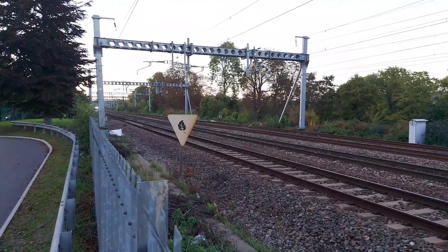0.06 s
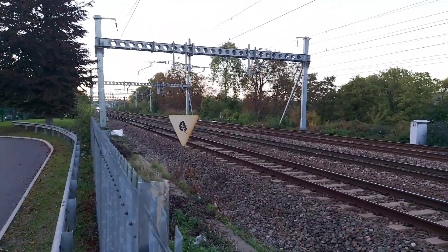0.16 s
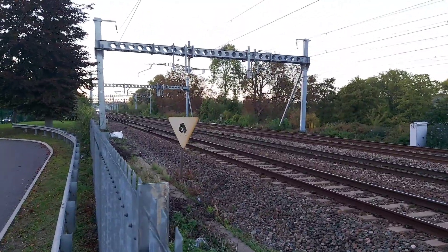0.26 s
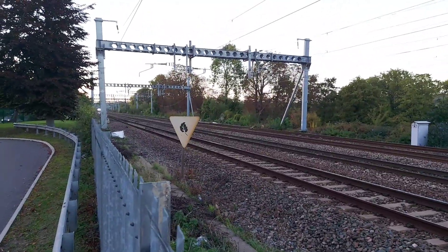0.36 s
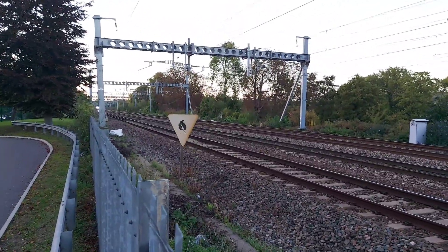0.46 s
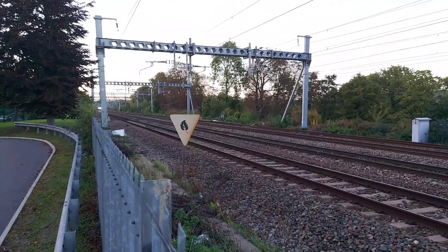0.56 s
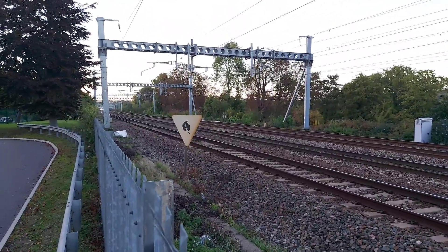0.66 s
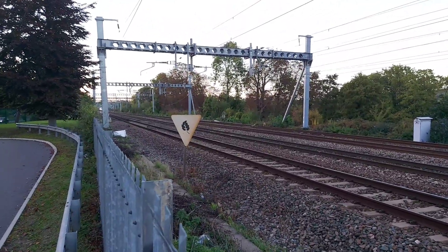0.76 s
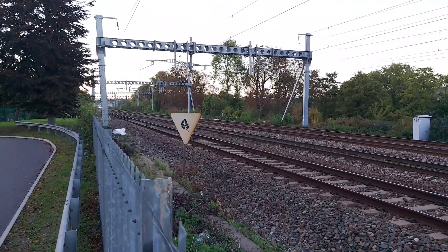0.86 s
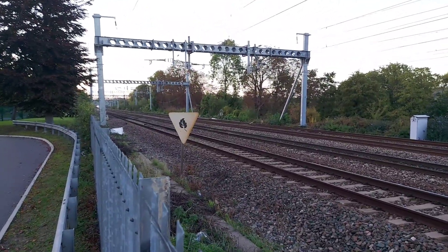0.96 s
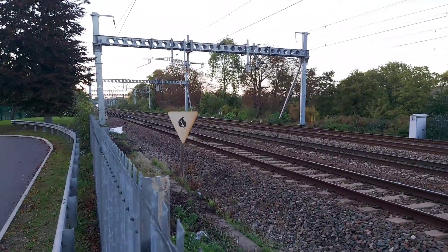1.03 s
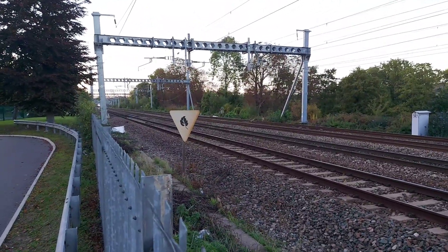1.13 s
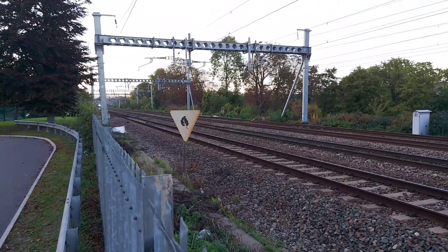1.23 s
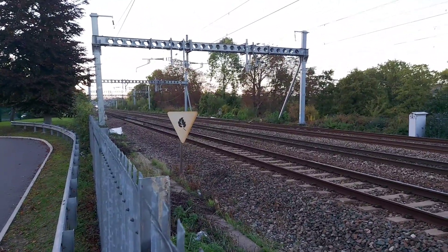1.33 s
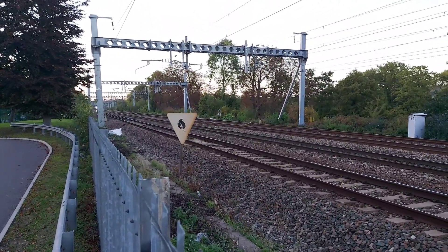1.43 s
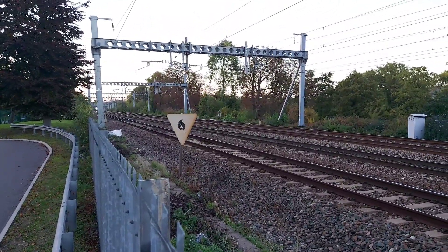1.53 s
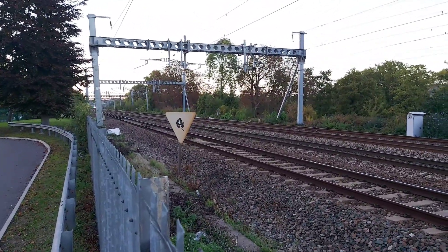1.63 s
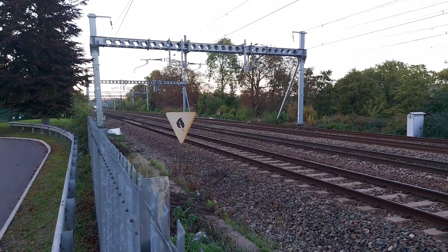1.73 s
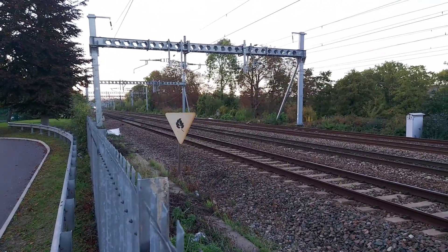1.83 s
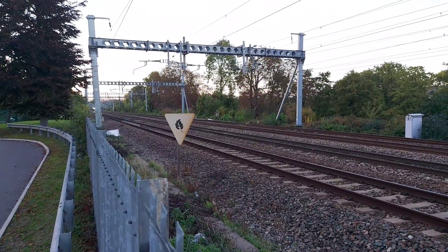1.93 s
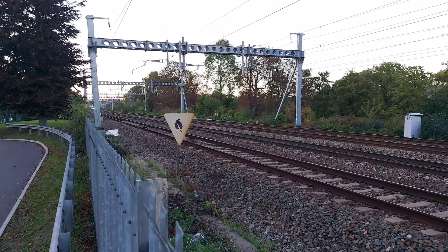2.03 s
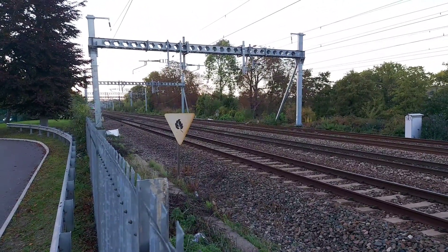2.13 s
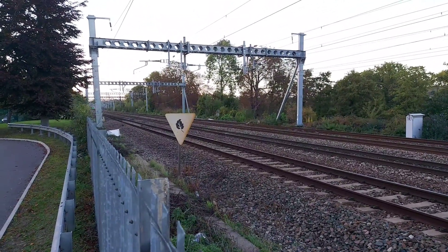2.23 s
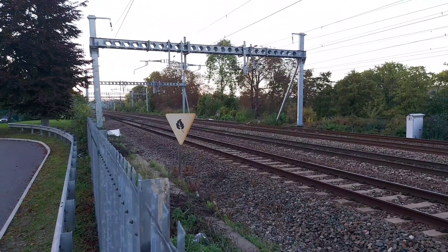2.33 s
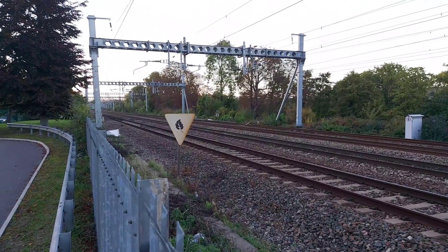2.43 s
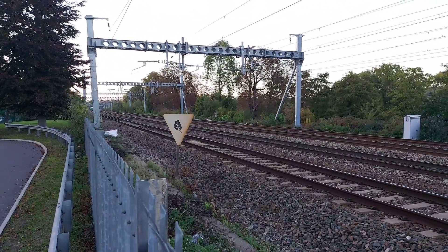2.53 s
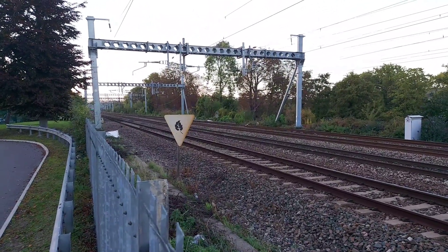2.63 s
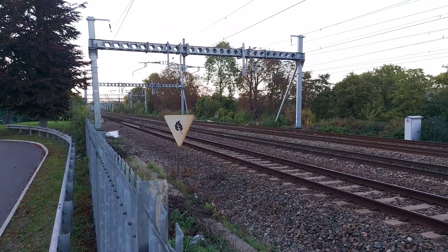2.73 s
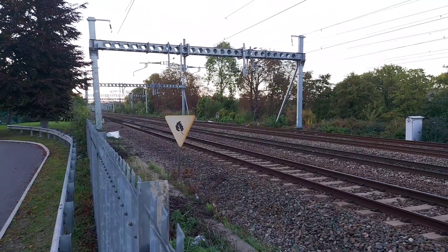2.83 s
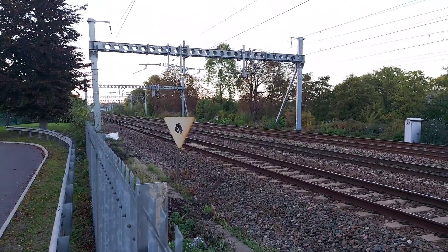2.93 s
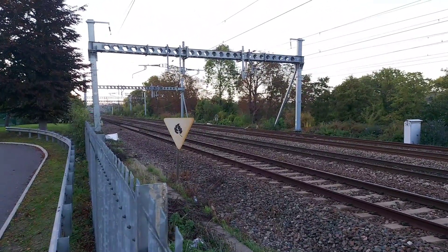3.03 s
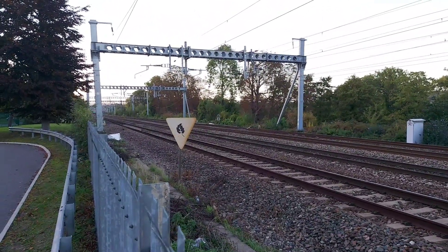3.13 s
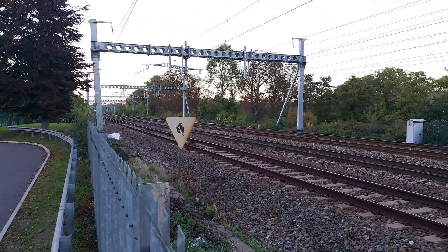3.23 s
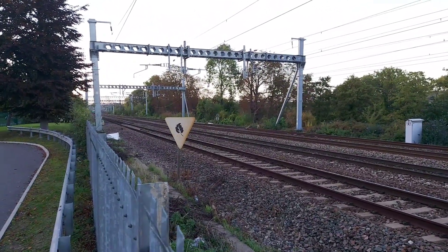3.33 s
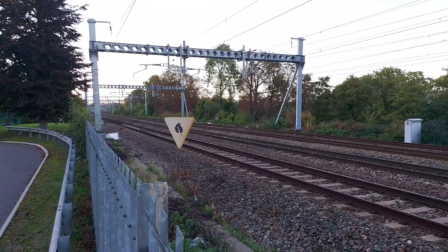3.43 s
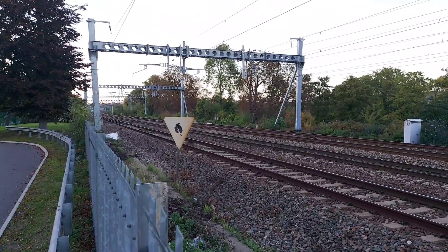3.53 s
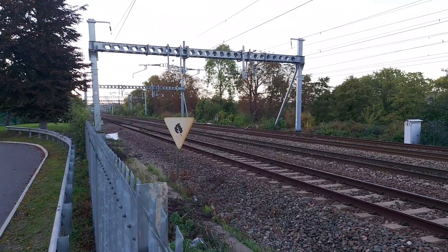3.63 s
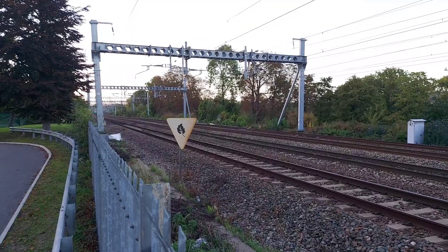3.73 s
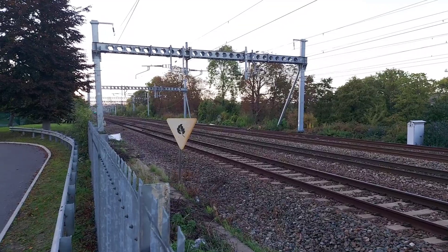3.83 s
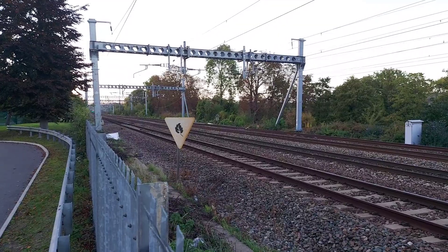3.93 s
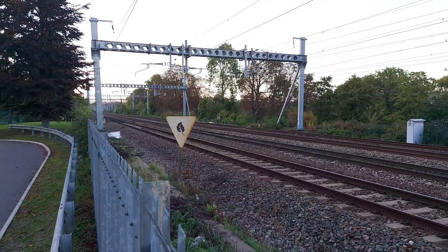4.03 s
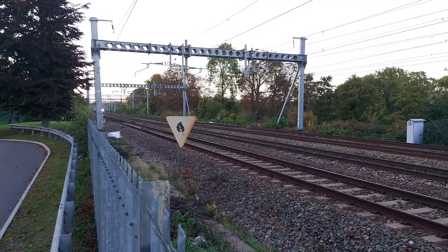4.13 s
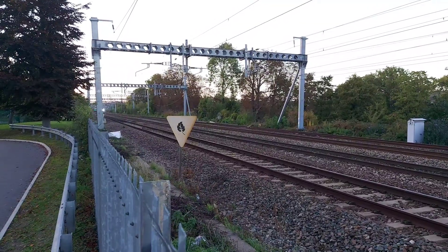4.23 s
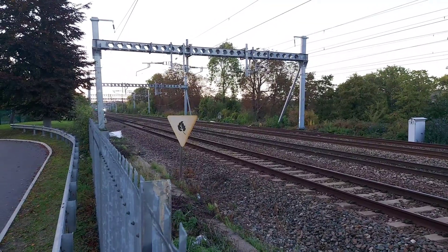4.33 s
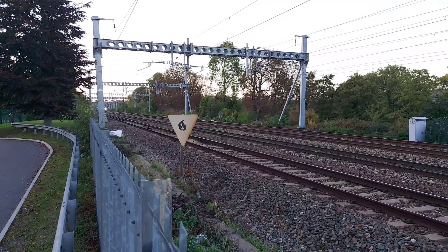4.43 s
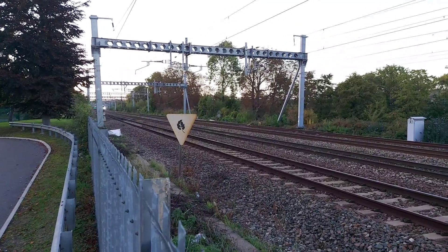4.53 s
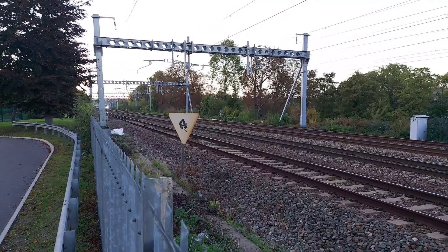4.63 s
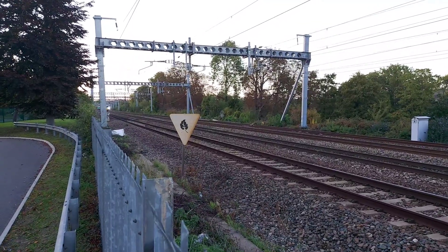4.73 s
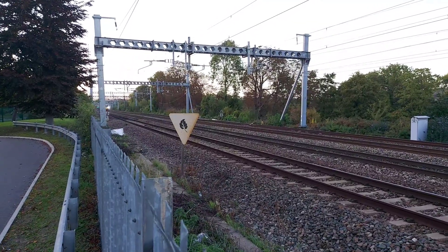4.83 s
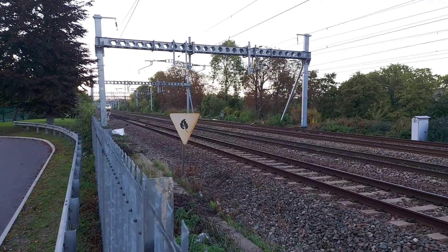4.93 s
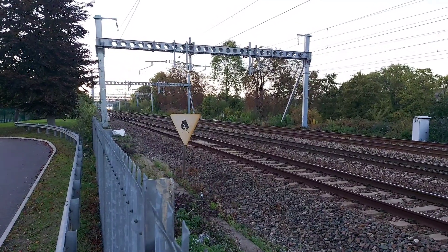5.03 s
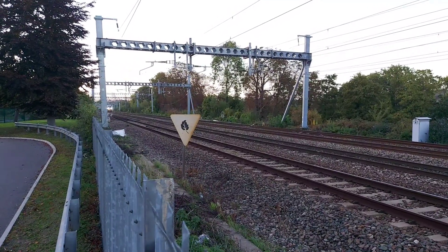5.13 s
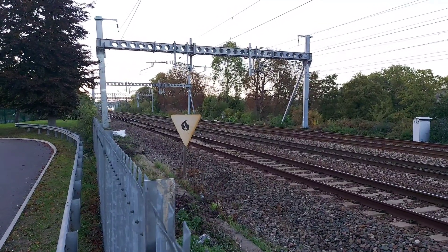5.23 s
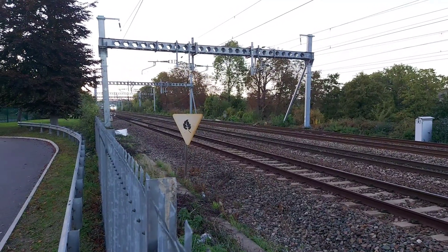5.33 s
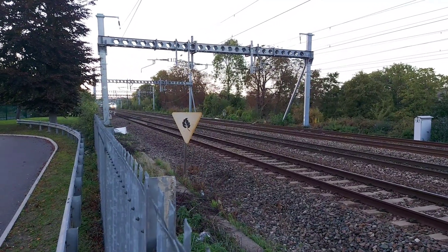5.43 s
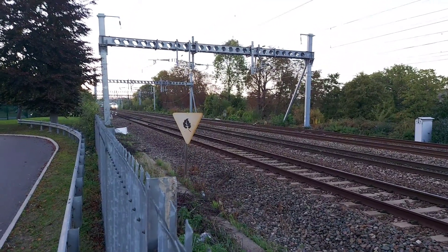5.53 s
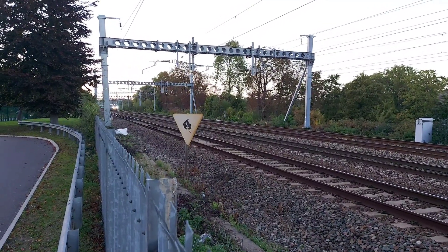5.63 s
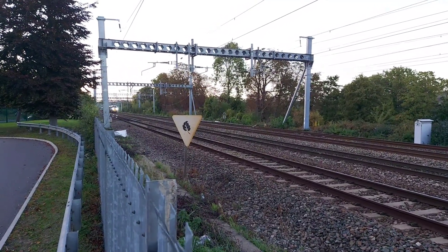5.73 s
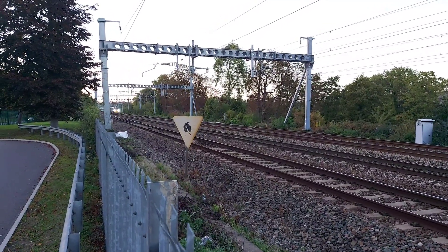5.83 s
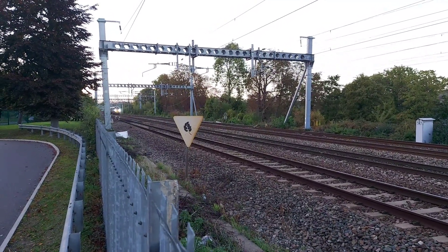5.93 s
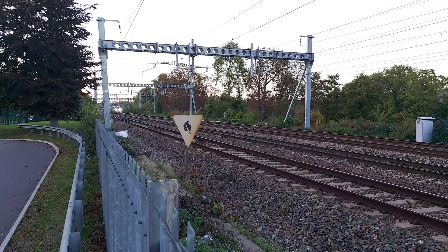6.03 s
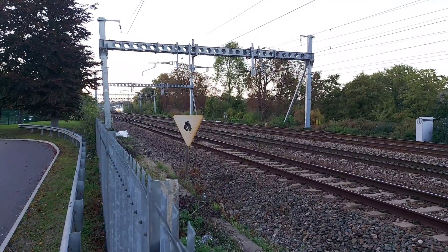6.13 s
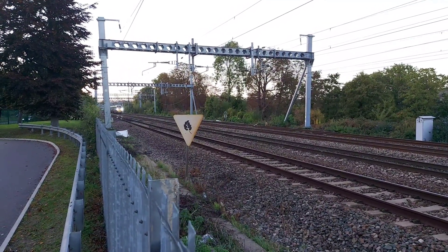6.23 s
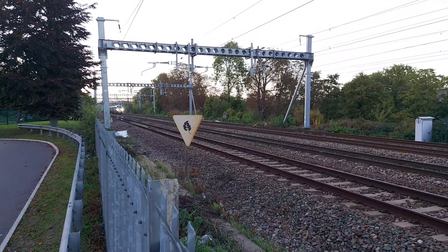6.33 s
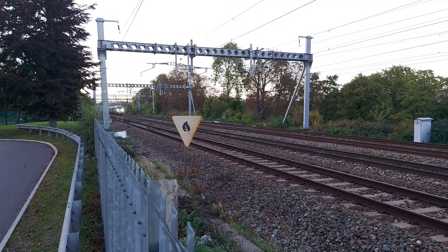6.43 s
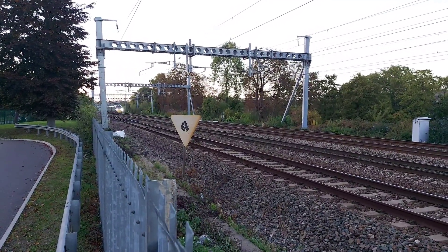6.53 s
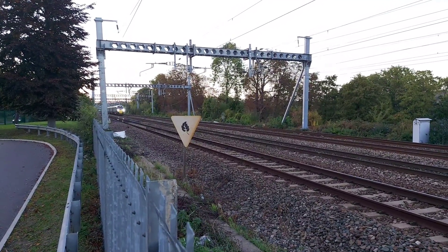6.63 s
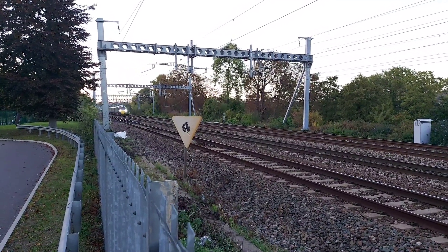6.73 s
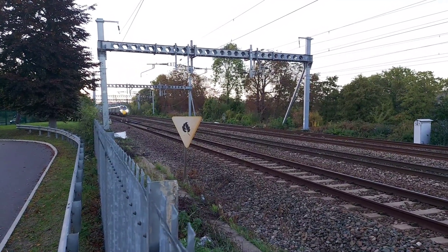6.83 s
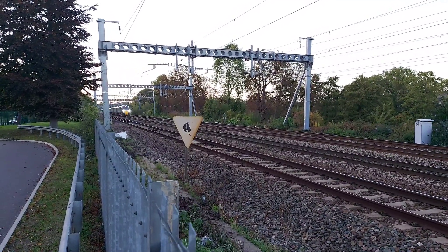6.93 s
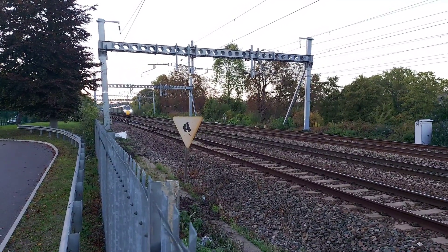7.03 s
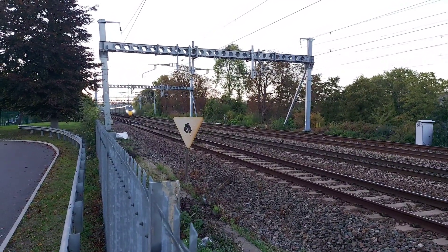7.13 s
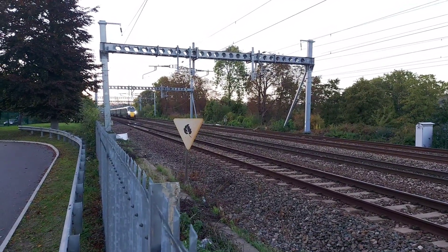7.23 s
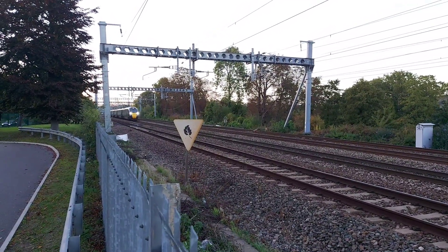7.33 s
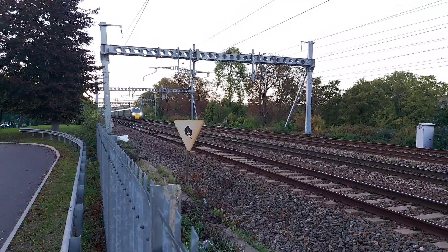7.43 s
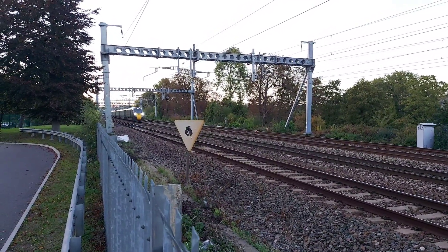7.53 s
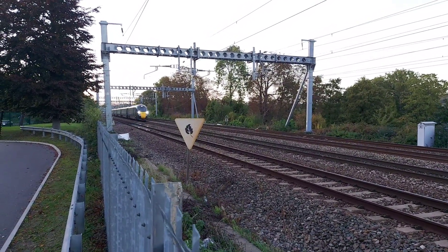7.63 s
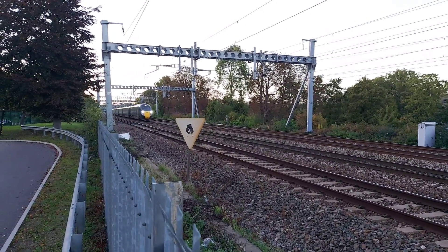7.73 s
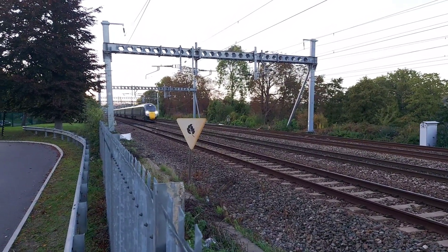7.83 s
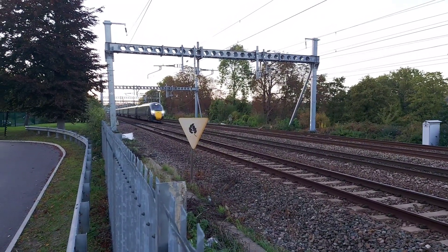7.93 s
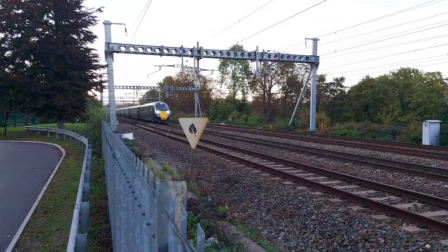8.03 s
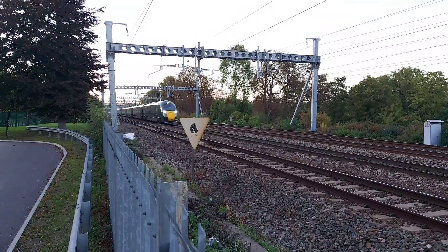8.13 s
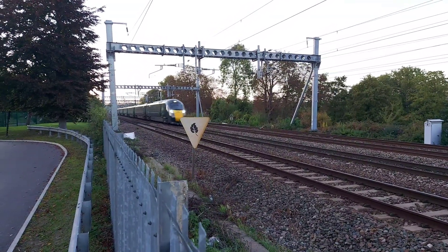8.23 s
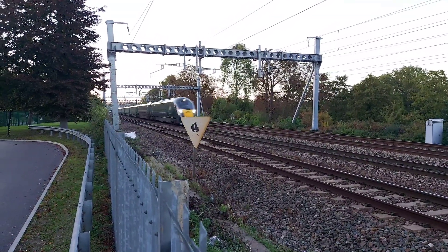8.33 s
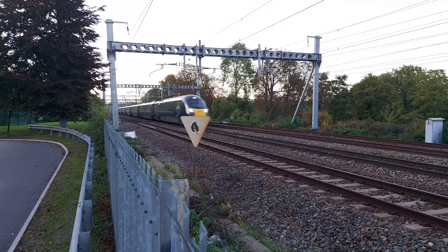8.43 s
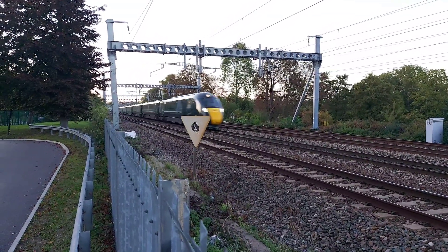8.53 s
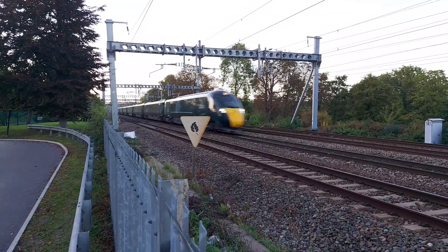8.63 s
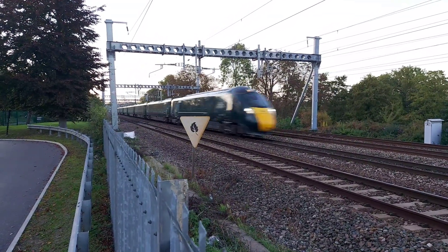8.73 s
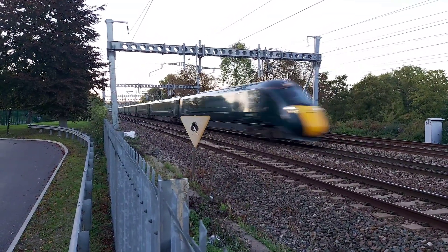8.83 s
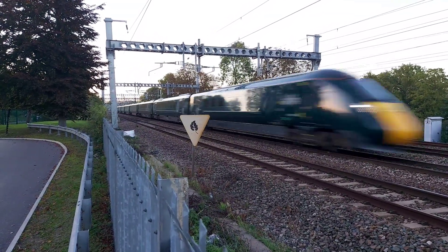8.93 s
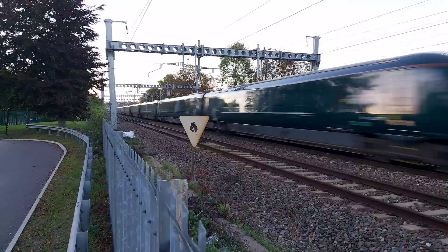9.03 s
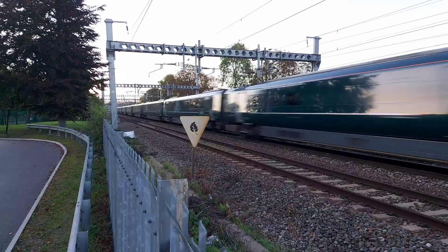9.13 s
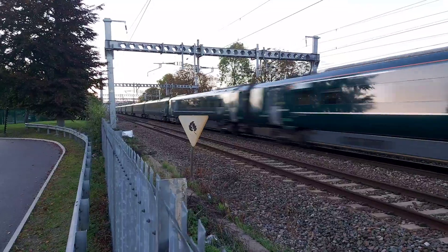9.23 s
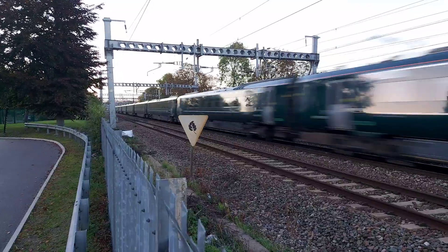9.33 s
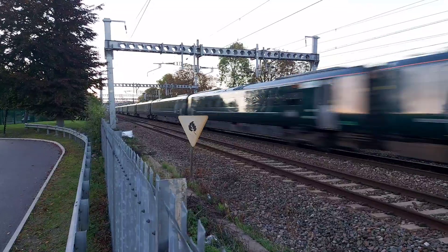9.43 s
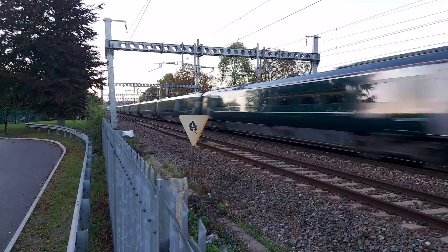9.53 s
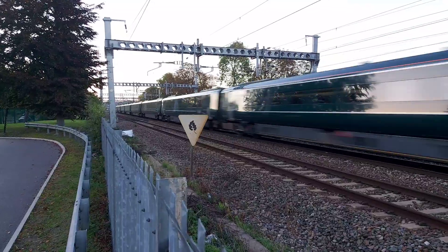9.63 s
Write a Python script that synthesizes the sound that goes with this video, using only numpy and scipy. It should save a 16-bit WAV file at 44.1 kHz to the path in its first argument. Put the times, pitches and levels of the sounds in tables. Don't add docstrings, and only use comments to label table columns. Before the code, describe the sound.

Outdoors beside a railway, a phone at the fence picks up soft far tyre noise, low engine hums, a few faint chirps and small dry ticks. A dull distant train roar slowly grows. High, shimmering rail hiss rises ahead of it, then the fast electric train bursts past with bright roar, ground rumble, narrow rail hum, ringing wheels and thuds, ending at full strength.

```python
import sys
import numpy as np
from scipy import signal
from scipy.fft import irfft
from scipy.io import wavfile
from scipy.ndimage import uniform_filter1d

SR = 44100
rng = np.random.default_rng(int(sys.argv[2]) if len(sys.argv) > 2 else 0)


def log_audio(samples):
    frames = np.atleast_2d(samples).T
    limited = np.clip(frames, -1, 1)
    pcm = np.round(limited * 32767).astype(np.int16)
    wavfile.write(sys.argv[1], SR, pcm)


def linear_from_db(decibels):
    return 10 ** (np.asarray(decibels, float) / 20)


N = 426447

WIN, HOP = 2048, 256
HZ = np.arange(WIN // 2 + 1)[:, None] * SR / WIN + 1e-3
S = np.arange(N // HOP + 2) * HOP / SR

# (pitch [Hz], width [Hz], level [dB])
ROAD = [(920, 440, -47), (3270, 830, -64)]
# (start [s], end [s], start pitch [Hz], end pitch [Hz], level [dB])
HUMS = [
    (0, 1, 78, 77, -44.5),
    (1.16, 3.93, 114, 114.1, -46),
    (3.5, 7.2, 53, 52.9, -43),
    (7, 9.5, 60, 72.3, -32),
    (2, 6.6, 250, 226.8, -49),
    (4.4, 6.9, 109.8, 104, -43.5),
]
# (start [s], end [s], start pitch [Hz], end pitch [Hz], level [dB])
BIRDS = [
    (.68, .72, 3400, 3600, -72),
    (.72, .76, 3950, 4150, -67),
    (.8, .83, 4800, 4850, -77),
    (2.78, 2.85, 5400, 5500, -72),
    (2.87, 2.95, 5600, 5800, -67),
    (2.98, 3.15, 6060, 5980, -70),
    (3.16, 3.26, 6050, 5950, -69),
    (3.1, 3.22, 4100, 4070, -69),
    (3.77, 4.24, 8620, 8580, -85),
]
# (time [s], peak [dB], left minus right [dB])
TICKS = [
    (1.0784, -66, -2.5),
    (1.697, -50, -2.5),
    (2.578, -49, -7),
    (5.5707, -47, -1.5),
    (5.5914, -45, -2.5),
    (5.601, -37, -13),
]
# (pitch [Hz], level [dB per Hz])
RUMBLE_TONE = [(12, -44), (20, -23), (43, -1.5), (65, -3.5), (83, -1.5), (108, -12.5), (140, -11),
               (180, -41), (310, -120)]
# (time [s], length [s], level [dB])
SHOVES = [
    (8.66, 0.077, 0.5),
    (9.05, 0.053, 2),
    (9.32, 0.079, 7.5),
    (9.45, .06, -6),
]
# (pitch [Hz], width [Hz])
RAIL_BANDS = [(12080, 700), (13800, 1400), (15250, 1100)]
# (level on arrival [dB], loss ahead [dB/s], bend [dB/s^2],
# fall after [dB/s])
RAIL_HIGH = [(-55.5, 4, 1.35, .1), (-46.5, 5, 1.2, 3), (-53, 5, .35, 1)]
# (pitch [Hz], width [Hz], level against the band [dB])
RAIL_PEAKS = [(13480, 200, -15), (14350, 200, -14), (12880, 450, -9)]
# (pitch [Hz], width [Hz], level on arrival [dB], loss per s still to come [dB/s])
RAIL_MODES = [(1991, 45, -37, 7), (1783, 100, -39, 4), (1550, 91, -40.5, 7), (2580, 370, -43, 7),
              (3470, 720, -53, 2), (3870, 410, -48, 3), (5220, 480, -52.5, 4), (6590, 90, -52, 7),
              (6920, 120, -54, 7.5), (7070, 490, -48.5, 8.5)]
# (time [s], length [s], level [dB])
LOADS = [
    (8.79, .05, 7.5),
    (9.0, 0.072, 7),
    (9.14, 0.059, 9.5),
    (9.52, 0.054, 13.5),
    (9.65, 0.025, 13.5),
]
# (time [s], length [s], ring [dB], whistle [dB], thud [dB])
BOGIES = [
    (8.78, .12, -42, -57, -47),
    (9.167, 0.17, -26.5, -39, -42),
    (9.244, 0.058, -36, -34, -25.5),
    (9.56, 0.24, -23.5, -34.5, -26),
]
# (pitch [Hz], width [Hz], level [dB])
WHEEL = [(995, 60, -13.5), (1420, 150, -3.5), (1594, 150, -4.5), (1960, 170, -6), (2310, 35, -9.5),
         (224, 50, -18)]
# (time [s], level [dB])
ROAR = [(0.0, -48.5), (4.49, -38.5), (5.3, -38.5), (7.24, -35), (8.48, -26.5), (8.54, -27), (8.78, -23),
        (8.86, -23), (9.16, -20.5), (9.29, -23.5), (9.48, -22.5), (9.53, -22.5), (9.56, -22), (9.67, -23)]
# (pitch [Hz], level [dB per Hz])
ROAR_FAR = [(71, -30), (120, -1.5), (138, -1.5), (189, -6.5), (242, -1), (289, -6.5), (498, -14.5),
            (829, -12), (1330, -16.5), (1960, -16.5), (3100, -28), (5250, -43), (6370, -48.5), (7070, -66),
            (8000, -57), (10400, -87), (17600, -120)]
# (pitch [Hz], level [dB per Hz])
ROAR_NEAR = [(71, -34), (120, -11.5), (230, -2.5), (353, -10), (509, -14), (781, 2), (1080, -11),
             (1470, -8.5), (2030, -9), (2340, -12.5), (2650, -17), (5740, -44.5), (8800, -37),
             (13800, -37.5), (15600, -45)]
# (time [s], near share [0-1])
NEAR_SHARE = [(0, 0.24), (6.5, 0), (8.2, 0.46), (8.9, 0.93), (9.67, 1)]
# (time [s], length [s], treble [dB])
CLEAR_AIR = [
    (3.1, 0.2, 2.5),
    (4.7, 0.2, -1.5),
    (6.2, 0.61, -2.5),
    (7.2, 0.3, 3),
]
# (pitch [Hz], left minus right far [dB], left minus right near [dB])
PORTS = [(60, 2, 0), (400, 0, 0), (900, 2, 2), (1260, 0.5, 6.5), (2130, 5.5, 7.5), (3200, 1.5, 4),
         (4800, 4, -7), (6200, -1, -3), (7400, 2.5, -1.5), (8700, 1, 15.5), (10400, 13, 15),
         (11400, 11, 14), (12200, -8, 0), (15000, 4, 1)]
# (time [s], lead [samples])
LEAD = [(0, 18), (4, 13), (6.2, 13), (7.7, 12.5), (8.6, 8), (9.1, -4), (9.67, -14.5)]
# (pitch [Hz], likeness [0-1])
LIKENESS = [(60, .99), (200, .975), (400, .93), (850, .72), (1400, .47), (2050, .25), (3300, .62),
            (5300, .55), (6300, .35), (9000, .3), (12000, .4), (13500, .68)]
# (pitch [Hz], lead of the right port [radians])
SHADOW = [(2000, 0), (3300, -3.1), (4700, -4), (5700, -6.3), (6400, -8.5), (7100, -6.7)]
# (pitch [Hz], level [dB per Hz])
HISS = [(7000, -1), (8300, -3.5), (10000, -1.5), (12000, 0), (13500, 2.5), (15600, 3.5)]


def curves(table):
    s, *columns = np.transpose(table)
    return [np.interp(S, s, c) for c in columns]


def tone(points, column=1):
    p = np.array(points)
    return np.interp(np.log(HZ), np.log(p[:, 0]), p[:, column])


def shaped(shape_db, lo_hz, hi_hz, db):
    p = linear_from_db(shape_db) ** 2
    inside = (HZ >= lo_hz) & (HZ < hi_hz)
    return p * linear_from_db(db) ** 2 / np.sum(p * inside, axis=0)


def resonance(hz, width, db, order=2):
    offset = 2 * (HZ - hz) / width
    if order == 2:
        p = 1 / (1 + offset ** 2) ** 2
    else:
        p = 1 / (1 + offset ** order)
    return p * linear_from_db(db) ** 2 / np.sum(p, axis=0)


def patches(width_hz, length_s):
    field = rng.standard_normal((len(HZ), len(S)))
    for _ in range(2):
        field = uniform_filter1d(field, int(width_hz * WIN / SR), axis=0)
        field = uniform_filter1d(field, int(length_s * SR / HOP), axis=1)
    return field / field.std()


def ahead_of(s):
    knee_s = 0.2
    return knee_s * np.logaddexp(0, (s - S) / knee_s)


def swells(table):
    return sum(db * np.exp(-((S - s) / length) ** 2) for s, length, db in table)


def glides(table, wobble, rate_hz):
    out = np.zeros(N)
    for start, end, hz0, hz1, db in table:
        i, n = int(start * SR), int((end - start) * SR)
        k = int(SR / rate_hz)
        steps = np.repeat(rng.standard_normal((2, 200)), k, axis=1)[:, :n]
        pitch_drift, level_drift = uniform_filter1d(steps, k)
        hz = np.linspace(hz0, hz1, n) * (1 + wobble * pitch_drift)
        note = signal.windows.tukey(n, 0.4) * np.sin(2 * np.pi * np.cumsum(hz) / SR)
        out[i:i + n] += linear_from_db(db + 4.0 + 2.0 * level_drift) * note
    return out


def road():
    return sum(resonance(hz, width, db) for hz, width, db in ROAD)


def engines():
    return glides(HUMS, wobble=0.05, rate_hz=9)


def birds():
    return glides(BIRDS, wobble=0.014, rate_hz=220)


def ticks():
    t = np.arange(128) / SR
    burst = np.sin(np.pi * np.clip(t / 0.00034, 0, 1)) ** 2
    snap = np.sin(2 * np.pi * 4800 * t) * burst * 1.6
    out = np.zeros((2, N))
    for s, db, pan_db in TICKS:
        i = int((s + 0.001) * SR)
        out[:, i:i + len(t)] += linear_from_db(db + np.array([[pan_db], [-pan_db]]) / 2) * snap
    return out


def rumble():
    db = -18.5 + 0.75 * (curves(ROAR)[0] + 20.5) + swells(SHOVES)
    narrowing_db = 16 * curves(NEAR_SHARE)[0]
    shape = tone(RUMBLE_TONE) - narrowing_db * np.log2(HZ / 63.6) ** 2
    return shaped(shape, 30, 120, db - 2.0) * (HZ < 120)


def rails():
    high_arrive_s, low_arrive_s, leave_db_s = 8.47, 8.25, 5
    to_go, gone = ahead_of(high_arrive_s), np.maximum(S - high_arrive_s, 0)
    bands_db = [db + 3.0 - loss * to_go - bend * to_go ** 2 - fall * gone
                for db, loss, bend, fall in RAIL_HIGH]
    lowest_db, middle_db, highest_db = bands_db
    high = sum(resonance(hz, width, db, order=8) for (hz, width), db in zip(RAIL_BANDS, bands_db))
    high = high + sum(resonance(hz, width, db + middle_db) for hz, width, db in RAIL_PEAKS)
    high = high + resonance(12200, 200, lowest_db - 5)
    high = high + resonance(15600, 300, highest_db - 6)
    ahead, past = np.maximum(low_arrive_s - S, 0), np.maximum(S - low_arrive_s, 0)
    low = sum(resonance(hz, width, db - loss * ahead - leave_db_s * past)
              for hz, width, db, loss in RAIL_MODES)
    shimmer_db = patches(width_hz=210, length_s=0.27)
    return (high + low) * linear_from_db(shimmer_db) ** 2


def sleeper_hum():
    since = S - 8
    db = curves(ROAR)[0] - 9 + swells(LOADS)
    sagging_hz = 785 - 12 * since
    return resonance(sagging_hz, 85, db) * np.clip(since / 0.78, 0, 1)


def wheels():
    doppler = 0.041
    out = 0
    for s, length, db, whistle_db, thud_db in BOGIES:
        when = (S - s) / length
        shift = 1 - doppler * np.tanh(when)
        ring = sum(resonance(hz * shift, width, db + mode_db) for hz, width, mode_db in WHEEL)
        whistle = resonance(5700 * shift, 1700, whistle_db)
        thud = resonance(167, 35, thud_db)
        out = out + (ring + whistle + thud) * np.exp(-when ** 2)
    return out


def roar():
    level_db = curves(ROAR)[0]
    near = np.clip(curves(NEAR_SHARE)[0], 0, 1)
    hidden = 0.5 - 0.5 * np.tanh((S - 1.65) / 0.31)
    treble_db = -9.5 - 0.74 * ahead_of(10.1) - 2.5 * hidden + swells(CLEAR_AIR)
    top_db = -28.5 - 14 * ahead_of(7.82)
    shape = (1 - near) * tone(ROAR_FAR + [(15600, -75)]) + near * tone(ROAR_NEAR)
    body = shaped(shape, 534, 2100, level_db + 2.0)
    boom = shaped(shape, 140, 350, level_db - 1.5) + shaped(shape, 140, 350, -45)
    treble = shaped(shape, 3110, 5700, level_db + treble_db + 1.5)
    body = body * (1 - 0.6 * near * (abs(HZ - 780) < 90))
    main = body * (treble / body) ** np.clip((HZ - 2300) / 1200, 0, 1.5)
    main = main * (boom / body) ** np.clip((620 - HZ) / 300, 0, 1)
    main = main * (HZ >= 120) / (1 + (HZ / 7400) ** 30)
    top = shaped(tone(ROAR_NEAR), 8250, 11800, level_db + top_db + 2.0)
    top = top / (1 + ((8700 - 1200 * near) / HZ) ** 30)
    top = top * np.where(HZ > 11600, near ** 2, 1) * np.clip((S - 5.9) / 0.74, 0, 1)
    depth_db = tone([(500, 0.45), (3000, 0.8), (9000, 1.0), (15000, 1.1)])
    waver_db = depth_db * patches(width_hz=1280, length_s=0.054)
    return (main + top) * linear_from_db(waver_db) ** 2


def noise_frames():
    noise = rng.standard_normal(len(S) * HOP)
    return signal.stft(noise, nperseg=WIN, noverlap=WIN - HOP)[2][:, :len(S)]


def heard(bins):
    shared, own = noise_frames(), noise_frames()
    near, lead = curves(NEAR_SHARE)[0], curves(LEAD)[0]
    turn = np.where(HZ < 2000, -2 * np.pi * HZ * lead / SR, tone(SHADOW))
    turn = np.where(HZ < 8000, turn, 2 * np.pi * HZ * 19.25 / SR)
    like = tone(LIKENESS) * (1 - 0.7 * np.clip(near, 0, 1) ** 2 * (HZ > 2500))
    pan_db = (1 - near) * tone(PORTS) + near * tone(PORTS, column=2)
    left = shared * linear_from_db(pan_db / 2)
    right = like * shared * np.exp(1j * turn) + np.sqrt(1 - like ** 2) * own
    pair = np.sqrt(bins * len(HZ)) * np.array([left, right * linear_from_db(-pan_db / 2)])
    return signal.istft(pair, nperseg=WIN, noverlap=WIN - HOP)[1][:, :N]


def scene():
    noises = road() + rumble() + rails() + sleeper_hum() + wheels() + roar()
    return heard(noises) + engines() + birds() + ticks()


def top_cut(x):
    return signal.sosfilt(signal.butter(12, 15760, fs=SR, output="sos"), x)


def record(dry):
    shape = np.sqrt(shaped(tone(HISS), 9000, 15600, -83) * len(HZ))[:, 0]
    kernel = np.fft.fftshift(irfft(shape))[None]
    hiss = signal.fftconvolve(rng.standard_normal(dry.shape), kernel, "same", axes=1)
    hiss = hiss * linear_from_db(np.array([[1.7], [-1.7]]))
    bass_cut = signal.butter(6, 33, "high", fs=SR, output="sos")
    mix = signal.sosfilt(bass_cut, dry + hiss)
    return top_cut(mix)


dry = scene()
out = record(dry)
log_audio(out)
```